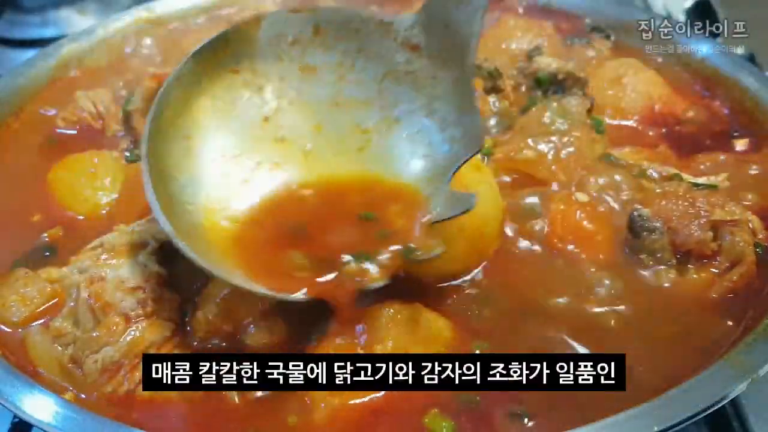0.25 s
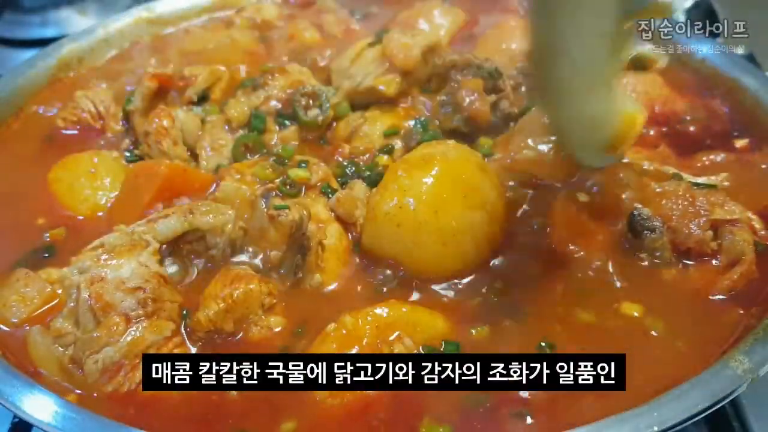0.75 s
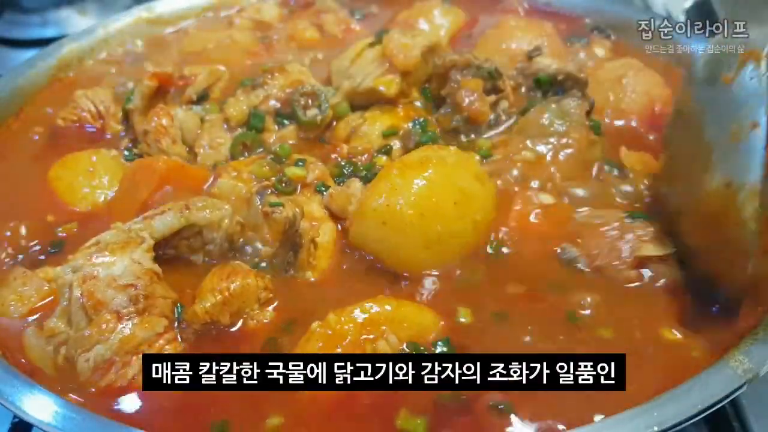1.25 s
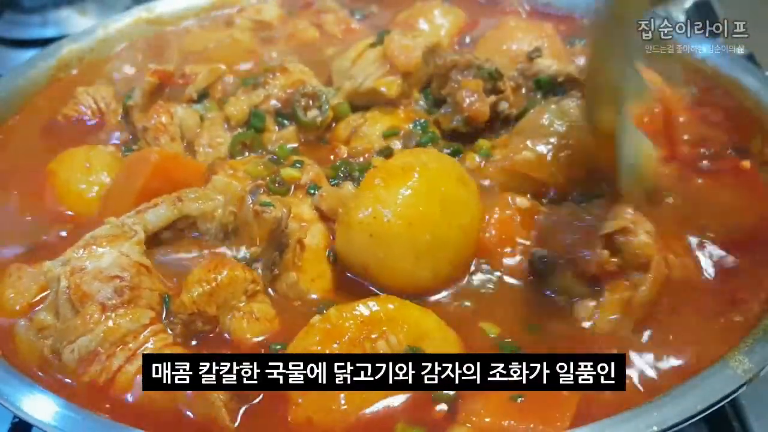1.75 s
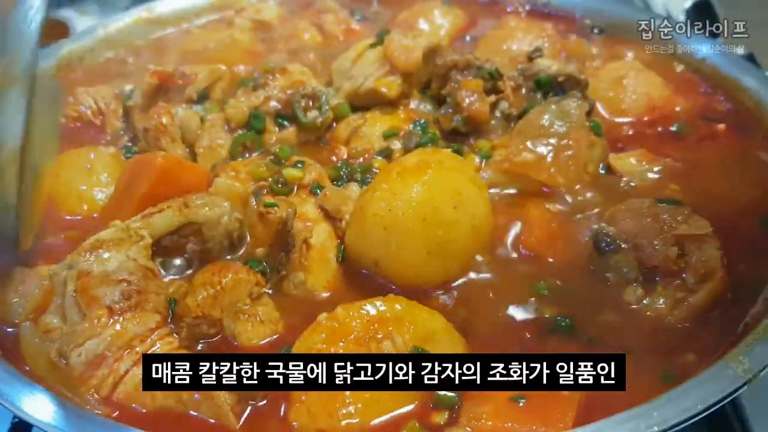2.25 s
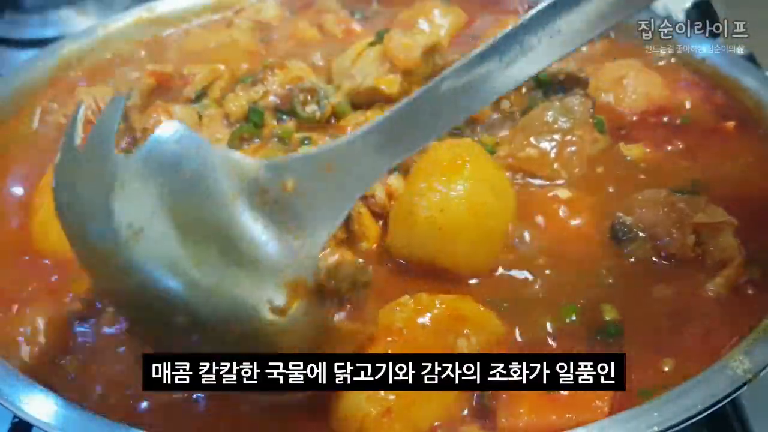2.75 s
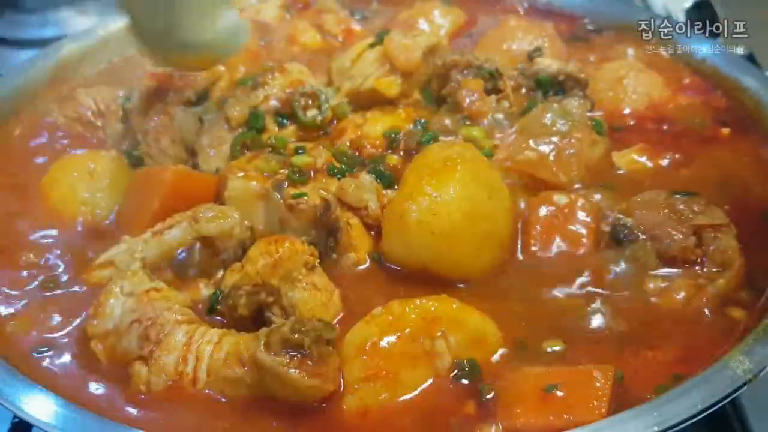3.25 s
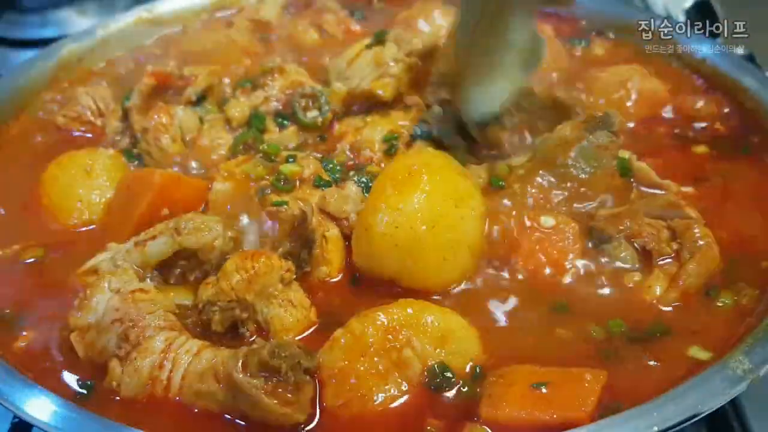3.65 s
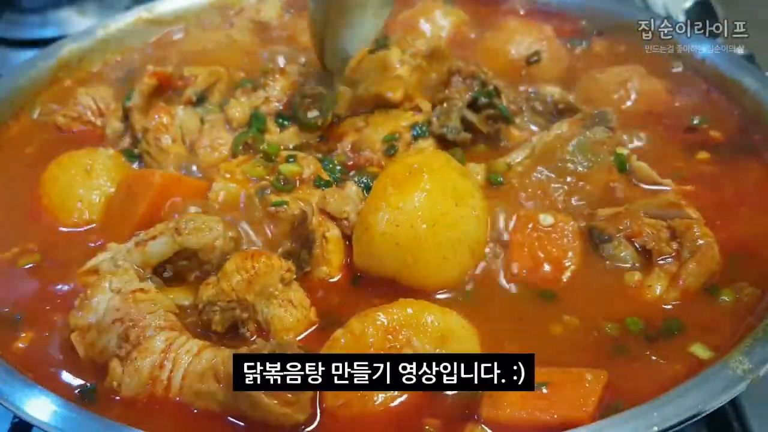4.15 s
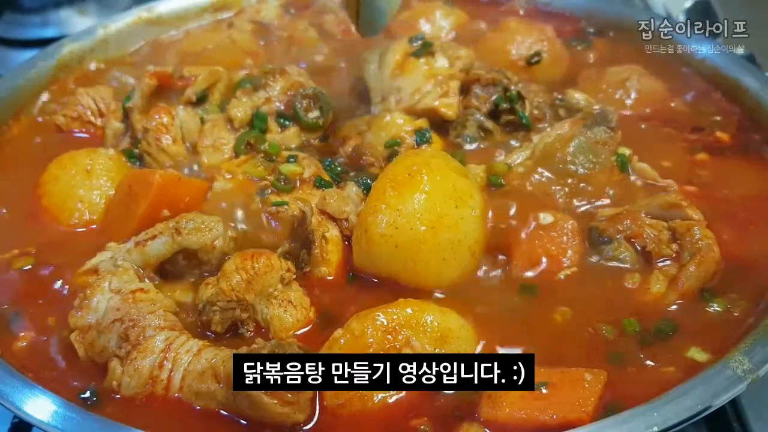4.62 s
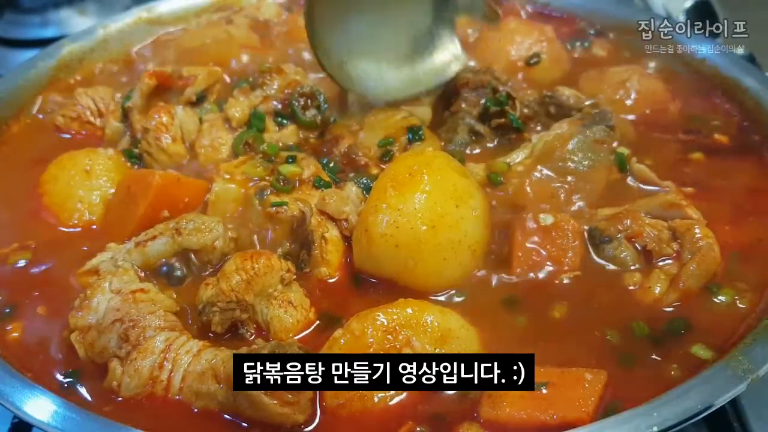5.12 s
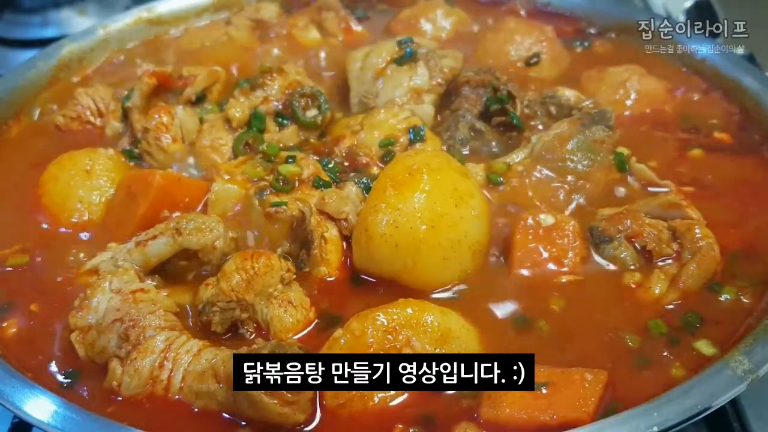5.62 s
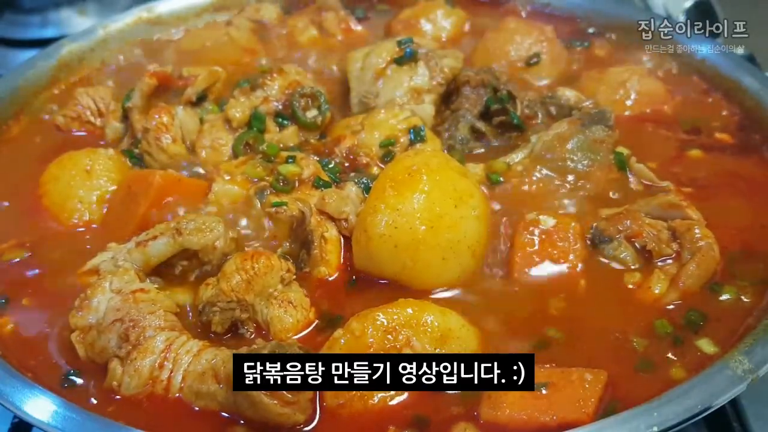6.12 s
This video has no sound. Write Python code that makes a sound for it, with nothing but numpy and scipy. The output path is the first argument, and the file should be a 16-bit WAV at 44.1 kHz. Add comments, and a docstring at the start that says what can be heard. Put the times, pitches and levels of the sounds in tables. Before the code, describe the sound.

Close mono sound of a thick stew at a steady boil in a wide steel pot on a kitchen stove. Round wet plops and small bright snaps burst irregularly over soft low glugs, a murmuring rumble and fine sizzle. A ladle gives two hard ticks on steel in the first second and a half, then only the boiling continues, its pops stronger and denser past the middle.

```python
"""Bubbles burst on a pot of thick stew boiling on a kitchen stove, close to a mono microphone.
Wide ones plop and small ones snap, as damped cavity tones with spray; the loudest stand out from random weaker ones.
Foam collapses in flurries of tiny tones, a ladle ticks on steel as a contact with clack and ring, and big bubbles glug.
Beneath them shaped noise and swarms of faint tones make the boil's rumble, soft plops and sizzle at the rim.
The pot colours these and the kitchen answers the near sources briefly; a faint mains hum is a sine."""
import sys
import numpy as np
from scipy import signal
from scipy.fft import rfft, irfft, next_fast_len
from scipy.io import wavfile
from scipy.ndimage import map_coordinates

SR = 44100
rng = np.random.default_rng(int(sys.argv[2]) if len(sys.argv) > 2 else 0)


def unload_wav(signal):
    """Save mono or channel-first audio to the path in sys.argv[1] as 16-bit WAV at rate SR, clipped to [-1, 1]."""
    wavfile.write(
        sys.argv[1],
        SR,
        np.round(np.clip(np.atleast_2d(signal).T, -1, 1) * 32767).astype(np.int16),
    )


N = 281358

# Levels in these tables are relative: each layer's own gain and the pot's response follow.
# the loudest bursting bubbles: (time [s], level [dB], nominal pitch [Hz], life [cycles])
LOUD_POPS = [(.014, -18.5, 1370, 0.42), (.0732, -29.5, 1230, 0.82), (.207, -18, 2500, 0.76),
             (.2288, -35.5, 5200, 2), (.2443, -29, 3460, 2.5), (.2843, -23.5, 3700, 1.4),
             (.321, -27, 3970, 1.3), (.338, -35, 970, 1.8), (.384, -30, 1060, 1.6),
             (.4034, -13.5, 1050, 0.075), (.408, -20, 1320, 0.19), (.4168, -31, 1240, 0.89),
             (.4798, -20.5, 5250, 1.1), (.531, -12.5, 2310, 0.15), (.541, -24.5, 3950, 1.4),
             (.621, -32, 444, 0.76), (.6455, -29.5, 940, 1.5), (.6495, -26, 1180, 1.4),
             (.7058, -14, 3690, 1.16), (.7429, -14.5, 1490, 0.38), (.7568, -19.5, 3760, 1.8),
             (.786, -24.5, 780, 0.48), (.8106, -23, 3380, 1.5), (.8147, -31, 1030, .8),
             (.829, -20, 1280, .45), (.9042, -28, 845, 1.2), (.9776, -24.5, 980, 0.63),
             (1.0208, -31, 3220, 1.8), (1.0326, -25, 3220, 2.1), (1.034, -31, 550, 1.05),
             (1.079, -33.5, 3380, 2), (1.107, -22, 2230, 0.67), (1.1148, -23.5, 3420, 1.8),
             (1.1354, -30.5, 3600, 1.8), (1.1867, -12, 3290, 1.1), (1.1971, -17.5, 977, 1.1),
             (1.2586, -23.5, 1990, 1.5), (1.2676, -17.5, 1720, 0.97), (1.301, -17.5, 3880, 1.3),
             (1.3747, -23, 2760, 1.2), (1.419, -18.5, 935, 1.5), (1.437, -21, 2480, 2.1),
             (1.5414, -20, 625, 0.31), (1.597, -24.5, 680, 0.4), (1.62, -32, 1180, 0.91),
             (1.6638, -26.5, 1760, 1.8), (1.7525, -26.5, 2170, 1.3), (1.76, -18, 2050, 0.57),
             (1.7726, -18.5, 1010, 0.62), (1.7745, -18, 2260, 0.76), (1.8076, -15.5, 3600, 0.84),
             (1.8078, -24, 1050, .7), (1.8393, -26.5, 3330, 1.6), (1.8675, -28.5, 3630, 2.4),
             (1.878, -24.5, 3520, 1.6), (1.902, -30.5, 930, 1.8), (1.9043, -20.5, 3620, 1.34),
             (2.0075, -20, 4260, .7), (2.089, -28.5, 770, 1), (2.1068, -24.5, 3060, 2.2),
             (2.18, -32.5, 1090, 1), (2.1922, -24.5, 3190, 1.1), (2.1975, -32, 416, 0.75),
             (2.2235, -19.5, 1160, 0.56), (2.2413, -26.5, 3380, 4.6), (2.2416, -22.5, 1170, 0.78),
             (2.334, -27, 653, 0.76), (2.35, -21.5, 1080, 0.84), (2.3805, -14.5, 1205, 1.05),
             (2.3945, -28, 955, 0.93), (2.4198, -10, 3240, 0.52), (2.442, -21.5, 1150, 0.56),
             (2.4735, -28, 5170, 1.6), (2.4953, -21.5, 915, 0.46), (2.5987, -17, 1170, 1.04),
             (2.6668, -30.5, 1370, 2.8), (2.6401, -27.5, 3740, 1.3), (2.7515, -28.5, 2620, 2.6),
             (2.7653, -31, 1260, 1.7), (2.794, -19.5, 3300, 0.89), (2.7987, -29, 1370, 1.5),
             (2.851, -27.5, 1500, 1.7), (2.8745, -25.5, 3120, 1.7), (2.8895, -20.5, 3500, 1),
             (2.9305, -24, 920, 1), (2.9365, -23.5, 1700, 0.66), (3.009, -26, 3620, 2.2),
             (3.0406, -24.5, 5000, 1.7), (3.0463, -28, 905, 1), (3.0525, -18.5, 905, 0.66),
             (3.0834, -24.5, 2250, 0.9), (3.102, -33, 940, 1.7), (3.1154, -20.5, 1450, 0.84),
             (3.155, -26, 3650, 2.7), (3.2624, -31.5, 3470, 2.9), (3.2778, -32, 5070, 1.8),
             (3.2946, -27.5, 1160, 0.8), (3.362, -22, 2970, 1.5), (3.3664, -13, 3100, 1.5),
             (3.3666, -32, 474, 0.42), (3.386, -19, 4000, 1.3), (3.3966, -28, 970, 2.4),
             (3.4055, -25.5, 5100, 1.3), (3.6175, -21, 1070, 0.64), (3.6726, -19, 3450, 1.7),
             (3.7031, -27.5, 5060, 1.3), (3.771, -21.5, 970, 1.5), (3.7755, -29, 470, 0.68),
             (3.8282, -27, 2180, 0.71), (3.8733, -21.5, 900, 0.52), (3.8736, -18, 3650, 1.1),
             (3.892, -13, 1830, 0.54), (3.895, -11.5, 2860, 0.72), (3.9155, -26, 4800, 3.3),
             (3.9436, -28.5, 970, 0.98), (3.969, -26.5, 1050, 0.85), (3.982, -34.5, 3390, 1.8),
             (4.0447, -30.5, 3470, 2.4), (4.052, -28, 1380, 1.5), (4.0675, -32.5, 3630, 2.3),
             (4.0763, -19.5, 1040, 1.1), (4.1292, -31.5, 5400, 1.6), (4.1352, -12, 3120, 1.17),
             (4.161, -20.5, 1960, 1.9), (4.1713, -24, 2900, 1.9), (4.181, -6, 1460, 0.45),
             (4.272, -17, 1380, 1.2), (4.2833, -12, 1600, 0.27), (4.29, -22, 1090, 0.5),
             (4.296, -28, 955, 2), (4.3734, -17, 2960, 1.3), (4.387, -28.5, 5230, 1.8),
             (4.465, -27, 1880, 1.3), (4.4765, -25, 2320, 1.1), (4.4976, -8.5, 3570, 2.6),
             (4.4978, -19, 1100, 0.31), (4.5105, -20, 3030, 1.5), (4.573, -21.5, 795, .5),
             (4.5744, -28, 2880, 1.8), (4.6098, -17, 1920, 0.46), (4.617, -14, 3030, 1),
             (4.6745, -28, 5070, 1.2), (4.698, -15.5, 1384, 1.33), (4.699, -14, 3720, 2.5),
             (4.7186, -21, 5440, 0.99), (4.7551, -26.5, 3470, 1.6), (4.7629, -28.5, 5160, 1.2),
             (4.788, -16.5, 1310, 0.65), (4.8224, -13, 1485, 0.99), (4.8292, -26, 1670, 0.77),
             (4.8658, -17, 2900, 0.46), (4.87, -21, 3730, 1.1), (4.9164, -29.5, 1370, 0.95),
             (4.9445, -30, 1110, 1), (4.962, -14, 1230, 0.81), (4.9707, -21.5, 800, 0.66),
             (4.9712, -16, 2840, 0.43), (4.9785, -20, 3050, 0.81), (4.9872, -32.5, 5320, 2.6),
             (5.1495, -27, 3030, 1.15), (5.2765, -28, 4830, 1.2), (5.3265, -31, 1190, 0.77),
             (5.3437, -29.5, 2640, 2.9), (5.4096, -23.5, 2860, 1), (5.447, -29.5, 505, 0.75),
             (5.45, -20.5, 1200, 0.3), (5.5504, -20, 3100, 2.1), (5.6117, -30, 1060, 0.79),
             (5.612, -30.5, 2260, 1.4), (5.7007, -27, 985, 1.7), (5.777, -18, 2400, 0.59),
             (5.851, -26, 950, 0.8), (5.8587, -24, 760, 0.7), (5.938, -22, 1370, 0.69),
             (5.9402, -34, 5100, 2.1), (6.0005, -19.5, 3900, 1.1), (6.0246, -25, 1150, .8),
             (6.1136, -30, 1270, 0.86), (6.1797, -30.5, 5080, 2.6), (6.2, -23, 2060, 0.87),
             (6.237, -23, 3680, 1.7), (6.3154, -28, 3140, 4.3), (6.3156, -31, 1190, 0.78),
             (6.3594, -23, 3860, 1.9)]
# the crowds of weaker bubbles: (rate [1/s], level [dB], level spread [dB], pitch [Hz], pitch spread [octaves])
WEAK_PLOPS = (6, -38.5, 4, 1201, 0.4)
WEAK_SNAPS = (10, -36, 2, 3100, 0.4)
WEAK_GLUGS = (8.5, -40.5, 2, 255.5, 0.23)
# collapsing patches of foam: (middle [s], length [s], level of a bubble [dB], pitch [Hz])
FOAM_PATCHES = [(0.008, .03, -29, 2020), (0.241, 0.034, -33, 3460), (0.543, 0.039, -33.5, 4060),
                (.635, .04, -45, 710), (0.697, 0.03, -33, 5100), (0.781, .07, -36, 1230),
                (1.115, 0.066, -37, 3640), (1.207, 0.037, -40.5, 1100), (1.274, .04, -33.5, 2950),
                (1.768, .04, -37.5, 770), (1.815, 0.045, -31, 4230), (2.345, .045, -38, 800),
                (2.613, .04, -31, 2090), (2.761, 0.025, -49, 2840), (3.159, 0.04, -37, 3130),
                (3.685, .055, -34.5, 3620), (3.892, 0.044, -30.5, 1700), (4.068, .03, -35.5, 1220),
                (4.107, 0.039, -31.5, 4730), (4.295, .04, -31, 4030), (4.614, 0.036, -29, 3650),
                (4.725, 0.045, -37, 4950), (4.799, .045, -43, 980), (4.975, 0.031, -41, 1010),
                (4.981, 0.044, -30, 4320), (5.422, 0.039, -31, 3720), (5.564, .04, -47, 3280),
                (5.66, .045, -41.5, 584), (5.697, .04, -33.5, 2880), (5.849, 0.033, -37, 1220),
                (6.203, .06, -29.5, 3000)]
# sharp ticks on steel while the ladle is moved over the pot: (time [s], level [dB], contact pitch [Hz])
LADLE_TICKS = [(0.748, -4, 3580), (0.751, -6, 4650), (1.3514, -6.5, 3150), (1.3578, -12, 4510)]
# spectrum of the steel's crowded modes, damped by the sauce: (frequency [Hz], density [dB per Hz])
STEEL_SPECTRUM = [(500, -24), (1900, -15), (2500, -11), (3150, 2), (3500, -7.5), (3900, 3.5), (4500, 1),
                  (5150, 3), (6200, -15.5), (7000, -5.5), (9000, -22.5)]
# the loudest steam bubbles under the surface: (time [s], level [dB], nominal pitch [Hz])
LOUD_GLUGS = [(0.023, -34, 252), (.08, -40, 241), (0.333, -33.5, 335), (.39, -33, 240), (0.448, -32.5, 258),
              (.527, -32, 255), (.795, -40, 165), (.865, -25.5, 259), (1.003, -30.5, 246),
              (1.082, -34.5, 200), (1.144, -35, 253), (1.375, -27.5, 256), (1.457, -31, 239),
              (1.543, -28, 227), (1.677, -35, 284), (1.749, -32, 185), (1.844, -35.5, 249),
              (2.076, -30.5, 227), (2.179, -30, 232), (2.394, -28.5, 234), (2.508, -29, 253),
              (2.626, -30.5, 238), (2.7, -33.5, 240), (2.894, -28.5, 224), (2.966, -27.5, 263),
              (3.05, -26, 280), (3.057, -39, 158), (3.138, -31.5, 270), (3.362, -35, 217),
              (3.46, -32.5, 273), (3.538, -32.5, 229), (3.717, -38, 227), (3.949, -38, 171),
              (4.093, -39.5, 158), (4.28, -32.5, 162.6), (4.341, -29.5, 259), (4.456, -33, 246),
              (4.552, -28.5, 255), (4.617, -32.5, 277), (4.647, -31, 269), (4.893, -32, 214),
              (4.972, -30.5, 207), (5.046, -32, 256), (5.052, -40.5, 161), (5.147, -30.5, 242),
              (5.32, -30.5, 248), (5.389, -32, 233), (5.553, -31, 239), (5.637, -31.5, 246),
              (5.645, -46, 92), (5.712, -27, 223), (5.771, -28.5, 240), (5.847, -32, 276),
              (6.014, -31, 274)]
# spectra of the deep boil, the soft plops and the sizzle: (frequency [Hz], density [dB per Hz])
RUMBLE_SPECTRUM = [(20, -41.5), (38, -21.5), (72, -15.5), (100, -17), (125, -5.5), (156, -4.5), (200, -1),
                   (280, 1.5), (330, -5.5), (380, -11), (480, -16.5), (580, -29), (1000, -65.5)]
PLOP_SPECTRUM = [(200, -11.5), (380, 1), (500, 2), (660, 0.5), (800, 3), (980, 3), (1350, 0.5),
                 (1700, -0.5), (2500, 3), (5000, -42.5)]
SIZZLE_SPECTRUM = [(500, -19.5), (1200, -5.5), (1900, 4.5), (2600, 5), (3200, 11), (4000, 9.5), (4700, 7),
                   (5300, 4), (6300, -2.5), (7400, -2), (8300, -17), (9300, -51.5)]
# the boil's rumble, the gurgling between the pieces, the simmering surface: (time [s], level [dB])
RUMBLE_LEVEL = [(0.0, -41.5), (0.32, -47.5), (0.94, -44.5), (1.4, -47.5), (1.78, -44.5), (2.24, -45.5),
                (2.49, -45), (4.01, -46.5), (4.18, -45), (5.4, -47), (5.65, -46), (6.38, -44.5)]
GURGLE_LEVEL = [(0, -47), (.28, -51), (.45, -47.5), (.7, -49.5), (.85, -47), (1.2, -49.5), (1.5, -50.5),
                (1.8, -47.5), (2.13, -50), (2.33, -48.5), (2.7, -47.5), (3, -47), (3.7, -49.5),
                (4.15, -46.5), (4.9, -46), (5.08, -52), (5.8, -45), (6.38, -48)]
SURFACE_LEVEL = [(0.0, -46.5), (0.5, -49.5), (0.66, -50), (1.14, -48), (1.26, -49), (1.53, -48.5),
                 (1.9, -50), (2.15, -47), (2.72, -47.5), (3.0, -46.5), (3.43, -48.5), (3.71, -49.5),
                 (4.14, -47), (4.85, -48), (5.1, -47.5), (5.4, -50.5), (5.81, -46), (6.38, -49.5)]
# resonances of the pot (above 0 dB) and bands its wall reflections cancel (below):
# (frequency [Hz], width [Hz], level [dB])
POT_BANDS = [(156.6, 8.2, 6.5), (186.5, 5.9, 2.5), (235.7, 11, 4), (505.3, 27, 8.5), (661, 45, 4),
             (818, 76, -14.5), (1645, 230, -12), (4620, 520, -15), (6500, 47000, 0)]
# decay of the kitchen's tail: (frequency [Hz], time to fall 60 dB [s])
KITCHEN_DECAY = [(200, 0.16), (1000, 0.11), (3500, 0.16), (5500, 0.2), (9000, 0.08)]

TEAR_S = 0.00006  # the shortest time in which a film tears
WALL_DELAY_S, WALL_DB = (.0007, .0024), -13  # range of delays of the pot wall's echo; its level against the pop
DROPLET_TOP_DB = -35  # cap on the spray's central level, before its scatter and the pops' gain
PLOP_CYCLES, SNAP_CYCLES, LIFE_SPREAD_OCTAVES = 1, 1.6, 0.3  # how long the weaker bubbles ring, and its scatter
CROWD_FOLLOWS = 0.91  # dB of bubble strength per dB of boil
# scatter of level, fall towards the ends of a flurry, scatter of pitch
FROTH_SPREAD_DB, FROTH_FADE_DB, FROTH_OCTAVES = 4, 11.5, 0.69
CONTACT_CYCLES = 1.14  # how long the contact rings
# a fast clack and a faint ring, against the tick's level
CLACK_DB, CLACK_T60_S, RING_DB, RING_T60_S = -16.5, 0.011, -34.5, 0.13
RUMBLE_DB, PLOP_DB, SIZZLE_DB = -0.88, -5, -3.5  # each layer against its level curve
SURGE_DB, SURGES_PER_S = 1.3, 18  # limit of the surges, and their random knots a second
TOP_HZ = 9280  # the recorder's band limit


def pops():
    """The film crackles as it thins, then tears; the cavity rings, the sauce slumps back, and droplets patter down."""
    plops = weak_pops(WEAK_PLOPS, PLOP_CYCLES)
    snaps = weak_pops(WEAK_SNAPS, SNAP_CYCLES)
    s, db, hz, life = np.vstack([LOUD_POPS, plops, snaps]).T
    thinning = spatter(s, db - 21, hz, delay=-0.0032, spread=0.38, count=2)
    # a longer-lived cavity opens more gently
    opening = np.hypot(0.46 * np.sqrt(np.abs(life)), TEAR_S * hz)[:, None]
    ring = bubbles(s, db, hz, life, onset=opening, rise=0.14, length=.02)
    # the tear gives one hard kick above the cavity's pitch, clearest in wide bubbles
    kick_db = db - 13 - 20 * np.log10(np.maximum(hz / 1300, 1))
    kick_life = np.full(len(s), .5)
    kick = bubbles(s + .55 / hz, kick_db, 1.51 * hz, kick_life, onset=0.7, rise=0, length=.004)
    # the pot's wall returns each pop
    echo_s = s + rng.uniform(*WALL_DELAY_S, len(s))
    echo = bubbles(echo_s, db + WALL_DB, hz, life, onset=opening, rise=0.062, length=.02)
    # wide, low-pitched bubbles move the most sauce
    slump_db = db - 12.0 - 30 * np.log10(np.maximum(hz / 1000, 1))
    slump_hz = 470 * np.exp(0.18 * rng.standard_normal(len(s)))
    slump_life = np.full(len(s), 0.8)
    slump = bubbles(s, slump_db, slump_hz, slump_life, onset=0.64, rise=0, length=0.022)
    # small, taut bubbles throw the most spray for their level
    spray_db = np.minimum(db - 13.0 + 8 * np.log10(hz / 2500), DROPLET_TOP_DB)
    spray = spatter(s, spray_db, hz, delay=0.0074, spread=.75, count=3)
    return amp(3.0) * (thinning + ring + kick + echo + slump + spray)


def weak_pops(kind, cycles):
    """Rows like those of LOUD_POPS for a crowd of one kind; a bubble that rings longer starts softer."""
    s, db, hz = crowd(SURFACE_LEVEL, *kind)
    stretch = 2 ** (LIFE_SPREAD_OCTAVES * rng.uniform(-0.91, 1, len(s)))
    return np.transpose([s, db - 10 * np.log10(stretch), hz, cycles * stretch])


def crowd(boil, per_s, db, spread_db, hz, spread_octaves):
    """Steam escapes in bubbles of chance timing and size, louder as the boil swells: (s, level dB, pitch Hz)."""
    count = int(per_s * N / SR)
    when, size, pitch = rng.standard_normal((count, 3)).T
    s = (np.arange(count) + .5 + .5 * when) / per_s
    boil_s, boil_db = np.transpose(boil)
    swell_db = CROWD_FOLLOWS * (np.interp(s, boil_s, boil_db) - boil_db.mean())
    bubble_db = db + swell_db + spread_db * np.clip(size, -2, 1)
    bubble_hz = hz * 2 ** (spread_octaves * np.clip(pitch, -2, 2))
    return s, bubble_db, bubble_hz


def spatter(s, db, hz, delay, spread, count):
    """A few tiny ticks for each bubble, scattered around a delay and in pitch between the bubble and 2700 Hz."""
    when, size, pitch = np.moveaxis(rng.standard_normal(size=(len(s), count, 3)), 2, 0)
    tick_s = s[:, None] + delay * np.exp(spread * when)
    tick_db = db[:, None] + 3 * np.tanh(size)
    tick_hz = np.sqrt(hz[:, None] * 2700) * np.exp(.35 * pitch)
    life = np.full(when.size, 1.2)
    return bubbles(tick_s.ravel(), tick_db.ravel(), tick_hz.ravel(), life, onset=.5, rise=.1, length=.006)


def bubbles(s, db, hz, life, onset, rise, length):
    """Damped cavity tones; life and onset are in cycles, and with a rise the pitch climbs as the cavity opens."""
    t = np.arange(int(length * SR)) / SR
    cycles = hz[:, None] * t
    age = cycles / np.maximum(life, .3)[:, None]  # no decay is quicker than 0.3 cycles
    phase = cycles * (1 + rise * (.5 - np.exp(-age / 2)))
    swell = 1 - np.exp(-(cycles / onset) ** 2)
    flow = np.exp(-age) * swell * np.sin(2 * np.pi * phase)
    # a small source radiates the change of its flow
    pressure = np.gradient(flow, axis=1) * SR / (2 * np.pi * hz[:, None])
    where = np.round(np.abs(s) * SR).astype(int)[:, None] + np.arange(len(t))
    return np.bincount(where.ravel(), (amp(db)[:, None] * pressure).ravel(), N)[:N]


def froth():
    """A patch of foam collapses in a quick flurry of tiny bubbles of mixed size."""
    count = 20
    s, length, db, hz = np.transpose(FOAM_PATCHES)[:, :, None]
    when, size, pitch = np.moveaxis(rng.uniform(-1, 1, (len(FOAM_PATCHES), count, 3)), 2, 0)
    share = (np.arange(count) + .5 + .5 * when) / count  # place within the flurry, 0 to 1
    burst_s = s + length * (share - .5)
    burst_db = db + FROTH_SPREAD_DB * size - FROTH_FADE_DB * (2 * share - 1) ** 2
    burst_hz = hz * 2 ** (FROTH_OCTAVES * pitch)
    life = np.full(when.size, 1.4)
    return bubbles(burst_s.ravel(), burst_db.ravel(), burst_hz.ravel(), life, onset=.4, rise=.1, length=.012)


def ticks():
    """A hard contact of a few cycles, a dense clack, then a brief ring of the steel."""
    s, db, hz = np.transpose(LADLE_TICKS)
    life = np.full(len(s), CONTACT_CYCLES)
    contact = bubbles(s, db + 2, hz, life, onset=0.49, rise=0.05, length=.008)
    t = np.arange(SR // 8) / SR
    decay = amp(CLACK_DB - 60 * t / CLACK_T60_S) + amp(RING_DB - 60 * t / RING_T60_S)
    envelope = np.zeros(N)
    for start, level in zip(s, db):
        envelope[round(start * SR):][:len(t)] += amp(level) * decay
    return contact + envelope * coloured(rng.standard_normal(N), STEEL_SPECTRUM)


def glugs():
    """Big bubbles swell softly and ring low in the thick sauce."""
    s, db, hz = np.hstack([np.transpose(LOUD_GLUGS), crowd(RUMBLE_LEVEL, *WEAK_GLUGS)])
    return bubbles(s, db + 1.8, hz, np.full(len(s), 2.3), onset=0.55, rise=0.1, length=.09)


def simmer():
    """The crowd of faint bubbles: a heaving rumble, soft plops, and clumps of fine crackle on a hiss."""
    (rumble_db,), (gurgle_db,), (surface_db,) = curves(RUMBLE_LEVEL), curves(GURGLE_LEVEL), curves(SURFACE_LEVEL)
    heave = amp(2.2 * np.tanh(wobble(22)))
    rumble = heave * coloured(rng.standard_normal(N), RUMBLE_SPECTRUM)
    soft = unit(swarm(rate=220, low_hz=503, high_hz=1780, life=1.1, range_db=23, length=0.014))
    plops = coloured(soft + amp(5.0) * rng.standard_normal(N), PLOP_SPECTRUM)
    fine = swarm(rate=800, low_hz=1840, high_hz=7000, life=2.1, range_db=13, length=.006)
    clumps = unit(fine * amp(3 * np.tanh(wobble(40))))  # bubbles burst in little rafts
    pinpricks = unit(swarm(rate=45, low_hz=5070, high_hz=7760, life=2.7, range_db=19.5, length=.004))
    hiss = amp(0.5) * rng.standard_normal(N)
    sizzle = coloured(clumps + amp(-22.0) * pinpricks + hiss, SIZZLE_SPECTRUM)
    surge_db = SURGE_DB * np.tanh(wobble(SURGES_PER_S))  # shared by plops and sizzle
    deep = amp(rumble_db + RUMBLE_DB) * rumble
    gurgle = amp(gurgle_db + PLOP_DB + surge_db) * plops
    surface = amp(surface_db + SIZZLE_DB + surge_db) * sizzle
    return deep + gurgle + surface


def swarm(rate, low_hz, high_hz, life, range_db, length):
    """Bubbles bursting at random, rate a second, many faint and few strong."""
    when, size, pitch, damping = rng.random((int(rate * N / SR), 4)).T
    hz = low_hz * (high_hz / low_hz) ** pitch
    # short rings start stronger for equal energy
    db = -range_db * np.sqrt(size) + 10 * np.log10(hz / low_hz)
    return bubbles(when * N / SR, db, hz, life * (.5 + damping), onset=0.2, rise=0.18, length=length)


def pot(x):
    """The pot rings at a few low pitches and hollows out other bands."""
    def band(f, hz, width, db):
        damping = 1j * f * width
        return 1 + (amp(db) - 1) * damping / (hz * hz - f * f + damping)

    return filtered(x, lambda f: np.prod([band(f, *row) for row in POT_BANDS], axis=0))


def kitchen(x):
    """A short diffuse tail in which each frequency dies at its own speed."""
    hz, t, z = signal.stft(rng.standard_normal(SR // 2), SR, nperseg=256)
    decay = amp(-60 * t / along(KITCHEN_DECAY, hz)[:, None])
    tail = signal.istft(z * decay, SR, nperseg=256)[1]
    delayed = np.pad(x, (int(0.0034 * SR), 0))  # the room answers 3.4 ms late
    return signal.fftconvolve(delayed, tail / np.linalg.norm(tail))[:N]


def hum():
    """A faint mains hum, slightly unsteady in level."""
    mains_hz = 60
    return amp(-62.5 + 1.8 * wobble(14)) * np.sin(2 * np.pi * mains_hz * np.arange(N) / SR)


def amp(db):
    """Decibels to gain."""
    return 10 ** (np.asarray(db) / 20)


def unit(x):
    """x at rms 1."""
    return x / np.sqrt(np.mean(x ** 2) + 1e-20)


def along(points, hz):
    """(Hz, value) points read on a log axis."""
    f, v = np.transpose(points)
    return np.interp(np.log(hz + 1), np.log(f + 1), v)


def curves(rows):
    """One value per sample for each column after the time."""
    s, *cols = np.transpose(rows)
    return [np.interp(np.arange(N) / SR, s, c) for c in cols]


def wobble(rate):
    """A smooth random curve, rate knots a second."""
    knots = rng.standard_normal(int(N * rate / SR) + 4)
    return map_coordinates(knots, [np.arange(N) * rate / SR])


def filtered(x, response):
    """x times a complex response of frequency."""
    m = next_fast_len(N + SR // 2)
    return irfft(rfft(x, m) * response(np.fft.rfftfreq(m, 1 / SR)), m)[:N]


def coloured(x, spectrum, size=8192):
    """x through a causal minimum-phase filter with the given spectrum, at rms 1."""
    cepstrum = irfft(np.log(amp(along(spectrum, np.fft.rfftfreq(size, 1 / SR)))))
    # doubling the cepstrum's positive half makes the filter causal
    one_sample = np.exp(-2j * np.pi * np.arange(size // 2 + 1) / size)
    response = irfft(np.exp(rfft(2 * cepstrum[1:size // 2], size) * one_sample))
    return unit(signal.fftconvolve(x, response)[:N])


def scene():
    """Everything reaches one close microphone, the same in both channels."""
    near = pops() + froth() + glugs() + ticks()
    room = amp(-14.5) * kitchen(near)
    mono = pot(near + room + simmer()) + hum()
    return np.array([mono, mono])


def record(dry):
    """The recorder rolls off the top treble and keeps nothing above its band limit."""
    knee_hz = 8300

    def response(hz):
        return (hz < TOP_HZ) / np.sqrt(1 + (hz / knee_hz) ** 36)

    return np.array([filtered(x, response) for x in dry])


dry = scene()
out = record(dry)
unload_wav(out)
```